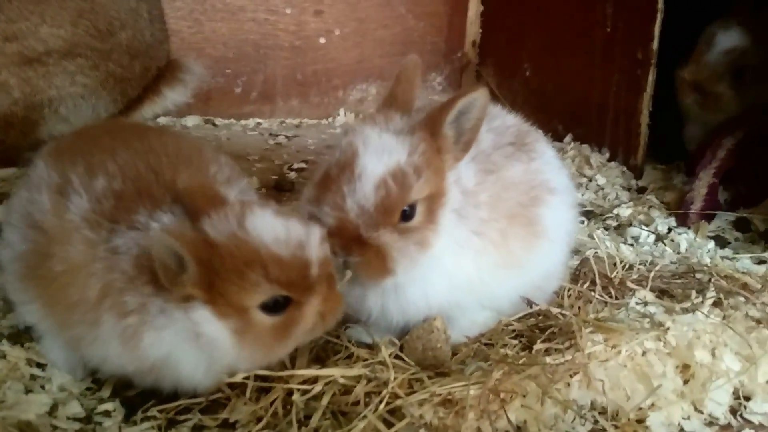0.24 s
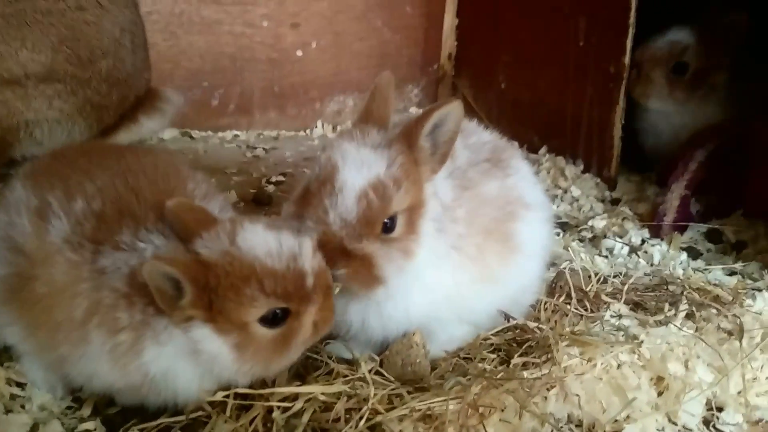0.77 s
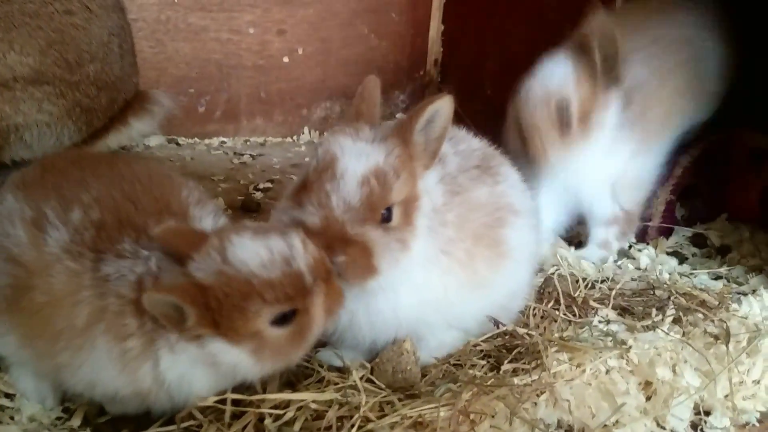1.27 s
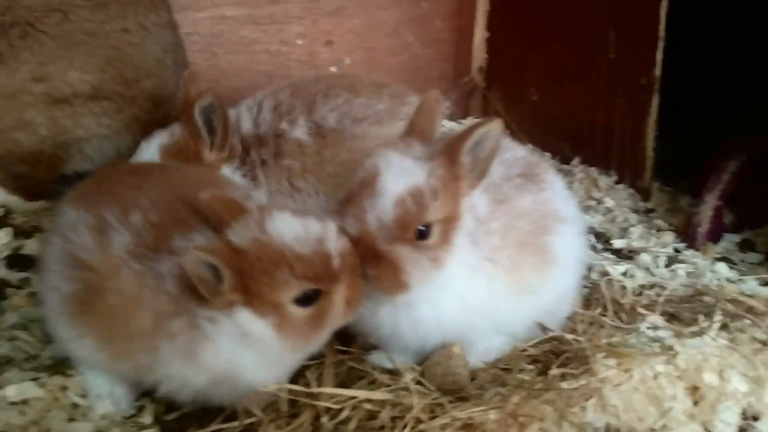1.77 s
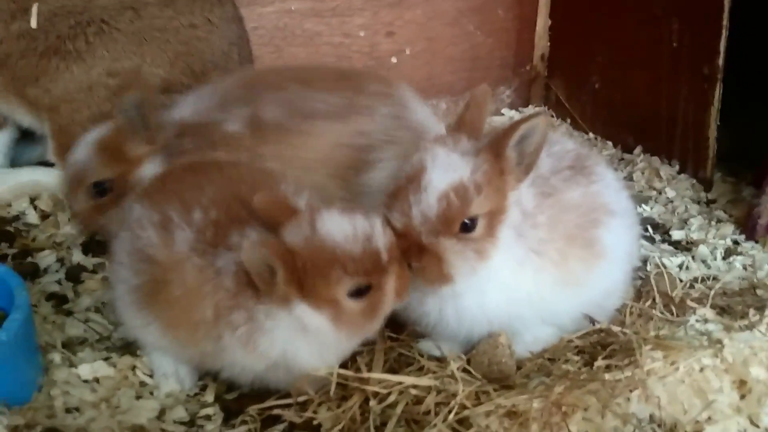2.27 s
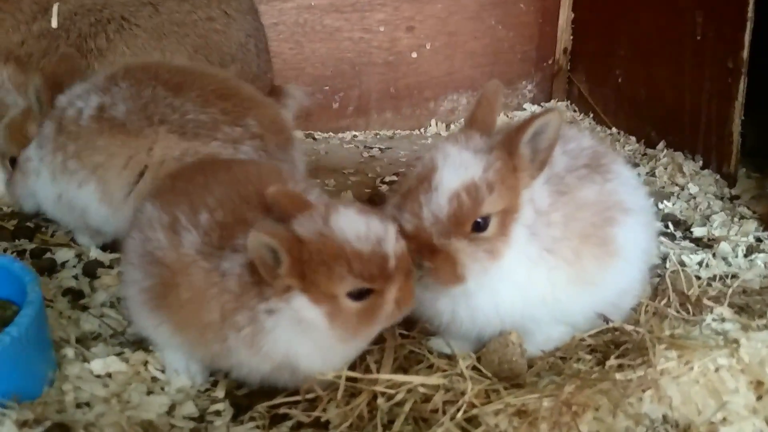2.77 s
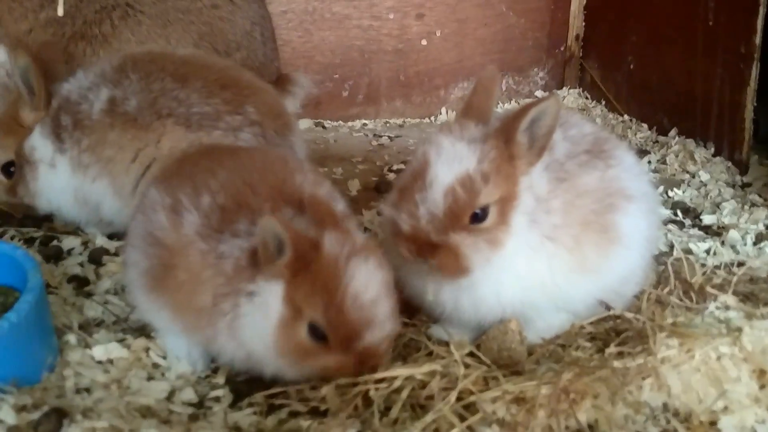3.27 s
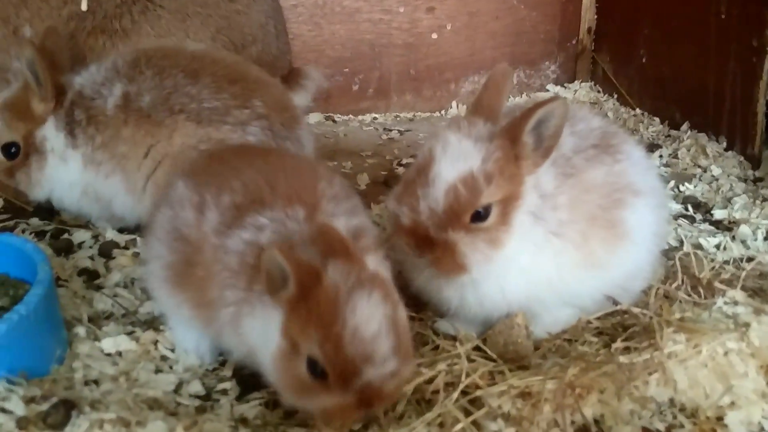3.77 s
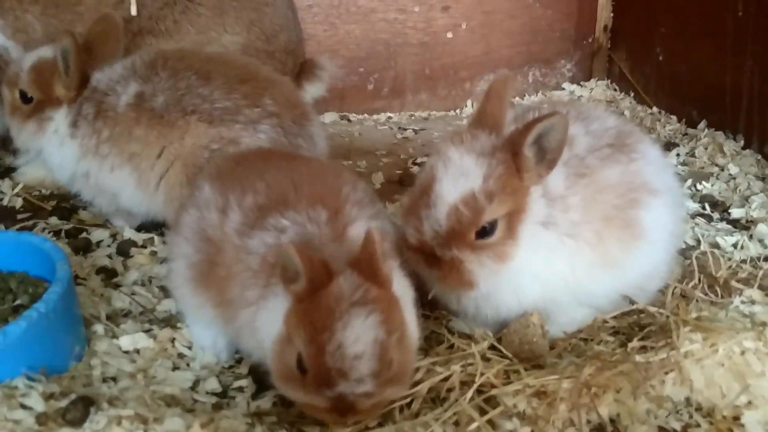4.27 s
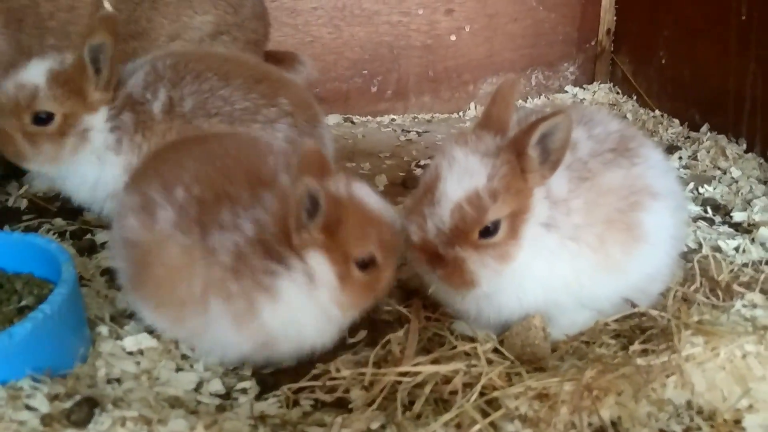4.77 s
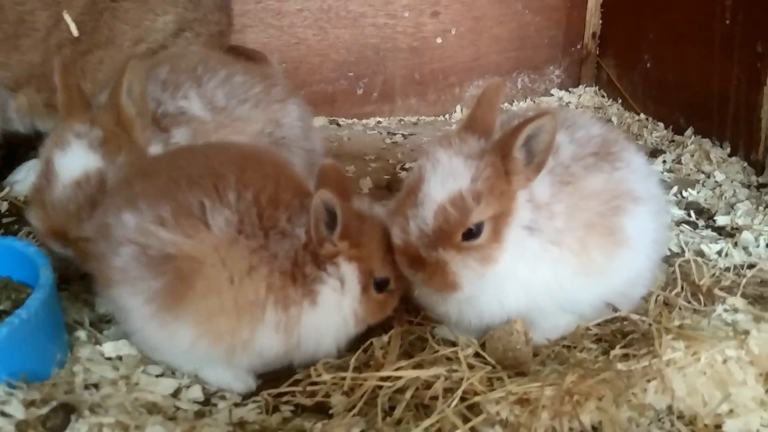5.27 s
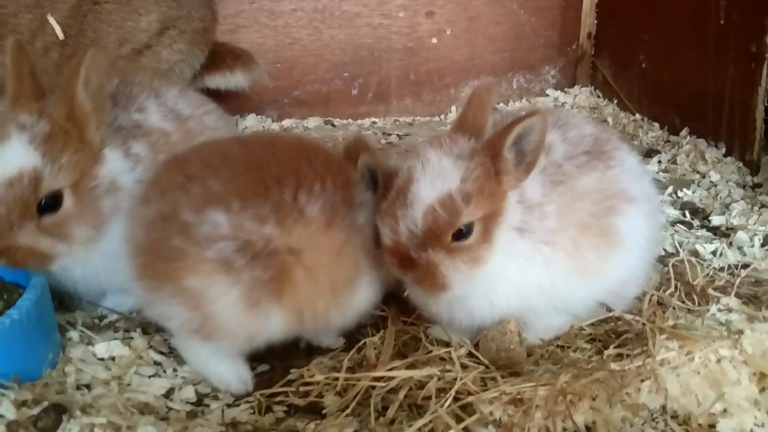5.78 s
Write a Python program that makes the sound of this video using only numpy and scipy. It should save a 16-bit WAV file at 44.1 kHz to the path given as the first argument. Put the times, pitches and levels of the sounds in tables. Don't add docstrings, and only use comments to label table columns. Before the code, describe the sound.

Dry wood shavings and hay rustle and crackle in irregular bursts as small rabbits shuffle through a wooden hutch, with faint knocks and thuds.

```python
import sys
import numpy as np
from scipy import signal
from scipy.fft import rfft, irfft
from scipy.io import wavfile
from scipy.ndimage import map_coordinates

SR = 44100
rng = np.random.default_rng(int(sys.argv[2]) if len(sys.argv) > 2 else 0)


def dump_mix(stems):
    frames = np.atleast_2d(stems).T
    limited = np.clip(frames, -1, 1)
    pcm = np.round(limited * 32767).astype(np.int16)
    wavfile.write(sys.argv[1], SR, pcm)


def elevation(decibels):
    levels = np.asarray(decibels, float)
    return 10 ** (levels / 20)


N = 266364

# start_s, held_s, level_db, coarse_flakes_above_it_db
MOVES = [(0.0, .12, -52, -9.5), (0.227, 0.027, -43.5, -8.5), (0.17, 0.032, -51, -5.5),
         (0.299, 0.14, -42.5, -10), (0.49, 0.19, -53.5, -17), (0.63, 0.3, -46, -12.5),
         (0.85, 0.18, -48.5, -14), (1.10, 0.15, -47, -13), (1.24, 0.23, -51.5, -14),
         (1.36, 0.17, -46, -7.5), (1.53, 0.13, -58.5, -5.5), (1.698, 0.099, -48.5, -13),
         (1.857, 0.17, -47, -17.5), (2.14, 0.22, -44.5, -14), (2.752, 0.14, -46.5, -11.5),
         (2.87, 0.32, -50.5, -8.5), (3.18, 0.041, -39.5, -19), (3.24, 0.047, -44, -9),
         (3.46, 0.094, -46.5, -9.5), (3.57, 0.073, -51.5, -7.5), (3.67, 0.31, -49, -12.5),
         (3.33, 0.063, -54.5, -10), (3.99, 0.044, -52.5, -12), (4.15, 0.15, -61, -20),
         (4.37, 0.038, -55, -7.5), (4.6, 0.146, -67, -17), (5.259, 0.24, -58, -6.5),
         (5.561, 0.046, -52.5, -4.5), (5.68, 0.263, -57, -8.5), (5.96, .1, -51, -11.5)]
# start_s, held_s, level_db
BRUSHES = [(0.0, 4.1, -53), (5.4, .64, -59), (0.30, 0.24, -63), (0.93, .04, -59), (1.38, .24, -46),
           (1.78, .22, -75), (2.24, 0.13, -46), (2.80, 0.22, -49), (3.038, 0.17, -48), (3.25, 0.039, -44),
           (3.46, .03, -59), (3.90, 0.093, -50), (5.56, 0.036, -59), (5.96, .08, -58)]
PRESS_S, SETTLE_DB_PER_S = 0.065, 315
REST_DB, REST_COARSE_DB, REST_FINE_DB = -86, -76.5, -80
MOVE_FINE_DB, MOVE_DUST_DB = -36, -24
BRUSH_FINE_DB, BRUSH_DUST_DB = -28, -11.5
COARSE_TOP_HZ, FINE_FROM_HZ, FINE_TOP_HZ, DUST_FROM_HZ = 3000, 7200, 12200, 13600
# start_s, peak_db, coarse_part_db, fine_part_db
SNAPS = [(0.22, -33, -12, -8), (1.122, -29, -12, -22), (0.3391, -37, -31, -11), (0.434, -24, -16, -9),
         (0.515, -39, -5.5, -19), (0.5518, -27.5, -16, -20), (0.911, -30, -17, -24),
         (0.933, -22, -10.5, -24), (1.0031, -27, -15, -27), (1.0919, -28, -39, -19),
         (1.0135, -23, -24, -25), (1.9017, -26, -22, -28), (2.351, -28, -26, -27),
         (1.2152, -16.5, -22, -40), (1.29, -30, -17, -23), (1.493, -29, -32, -42), (1.639, -35, -37, -33),
         (2.2854, -20, -12.5, -24), (2.7268, -36.5, -28, -34), (2.8916, -32, -33, -12),
         (2.9872, -33.5, -8, -38), (3.084, -34, -29, -27), (3.2105, -42, -20, -16), (3.911, -33, -11, -27),
         (5.7683, -32, -10, -7), (5.7625, -38, -7, -2), (5.80, -50, -15, 4), (2.177, -34, -20, -10)]
# start_s, peak_db, coarse_part_db, fine_part_db
CRUSHES = [(0.24, -43, -22, -8), (0.8732, -28.5, -29, -34), (0.9444, -29.5, -4.5, -29),
           (1.017, -29, -6, -26), (1.342, -28.5, -39, -24), (5.570, -35, -3, -22), (1, -32, -35, -20),
           (1.588, -33, -25, -31), (1.7537, -53, -31, -23), (1.7715, -42, -38, -29), (2.119, -33, -17, -22),
           (2.585, -35.5, -11.5, -29), (2.6748, -39.5, -8, -26), (2.3239, -24.5, -8.5, -30),
           (3.071, -27, -11, -13), (3.1892, -22, -23, -33), (4.157, -42, -16, -35), (4.3755, -39, -13, -30),
           (4.5594, -36, -14, -26), (4.575, -41, -10, -28), (4.7194, -45, -11, -35),
           (4.9112, -38, -10.5, -27), (5.1786, -47, -4, -31), (5.659, -41, -4, -32), (0.219, -36, -9, -16),
           (5.467, -42.5, -1, -20), (5.765, -32, -9, -10), (5.778, -37, -12, -20), (2.298, -32, -11, -17),
           (0.91, -35, -9, -30), (3.968, -41, -5, -30), (5.998, -36.5, -11, -11), (5.381, -43, -11, -18),
           (5.272, -42, -10, -20)]
# start_s, peak_db, coarse_part_db, fine_part_db
SLIDES = [(0.306, -25, -35, -21), (0.6404, -32, -12, -12), (0.7372, -38, -31, -17), (1.162, -25, -35, -21),
          (1.355, -35, -35, -26), (1.455, -19.5, -10, -49), (1.9464, -31, -38, -26),
          (2.158, -29.5, -28, -24), (2.2065, -23, -23, -22), (2.79, -36, -11, -16), (3.682, -29, -20, -36),
          (3.758, -26.5, -26, -32), (3.806, -28.5, -27, -26), (3.2582, -30.5, -6.5, -35),
          (3.4818, -37, -4, -14), (3.512, -23.5, -39, -24), (3.7266, -34, -30, -41),
          (4.2194, -51, -19, -33), (4.4608, -45, -9, -28), (5.4241, -42, -9, -23), (5.585, -54, 1, -28),
          (3.91, -35, -11, -28), (4.65, -51, -22, -30), (5.445, -46, -9, -13), (5.9708, -37, -12, -14)]
# shower_swells_s, shower_dies_s, first_crack_db
SNAP, CRUSH, SLIDE = (0.0023, 0.027, -1.7), (0.0033, 0.071, -27), (0.014, 0.1, -18)
BREAK_SIDE_DB = -3
# freq_hz, level_db_per_hz
BEDDING = [(410, -55.5), (700, -28), (1010, -20.5), (1120, -17.5), (1240, -14), (1650, -12.5), (2230, -5),
           (3130, -13), (4220, 1.5), (4740, 5), (5990, -4), (7580, -12.5), (11200, -8), (15700, -20)]
# time_s, left_lead_ms, left_right_db
LEFT_LEAD = [(0, 0.34, -6), (1, .32, -5.5), (2, 0.32, -3), (3, 0.33, -6.5), (3.9, 0.35, -4),
             (4.2, -0.17, -6), (5.4, 0.13, -9.5), (5.7, 0.12, -9)]
# start_s, peak_db, pitch_hz
FLICKS = [(0.1875, -36, 4380), (0.2204, -33, 4590), (0.3027, -29, 4880), (0.3802, -26, 2410),
          (0.435, -22, 5390), (0.4614, -42, 4860), (0.5404, -39, 4620), (0.5574, -36, 4800),
          (0.5774, -43, 4410), (0.5975, -28, 5460), (0.8719, -32, 5340), (0.9112, -27, 4170),
          (0.9318, -24, 4940), (0.945, -29, 4090), (0.9797, -24, 4170), (1.003, -27, 4070),
          (1.0131, -20, 4400), (1.0384, -34, 4330), (1.1583, -31, 4690), (1.1684, -29, 5060),
          (1.2146, -17, 4810), (1.29, -31, 4100), (1.4062, -33, 4720), (1.4461, -25.5, 2220),
          (1.4684, -27, 4560), (2.1754, -32, 5070), (2.2324, -31, 4820), (2.2684, -26, 4370),
          (2.2847, -19, 3870), (2.2984, -30, 5670), (2.3226, -28, 4390), (2.3304, -29, 4160),
          (3.6034, -38, 4460), (3.9214, -34, 4660), (4.0484, -44, 4650), (4.911, -43, 4860),
          (5.101, -46, 4300), (5.2724, -43, 4290), (5.3812, -41, 4480), (5.5644, -38, 2510),
          (5.576, -33, 2520), (5.6064, -39, 4450), (5.6977, -46, 2330), (5.7683, -19, 4540),
          (5.7784, -32, 4330), (5.9824, -36, 4400), (6.0064, -37, 4890)]
FLICK_CYCLES, FLICK_DB, FLICK_UPPER_DB = 22, -3.0, -13
# start_s, lasts_s, from_hz, to_hz, level_db
SQUEAKS = [(3.575, 0.038, 4400, 4460, -49.5), (3.622, 0.025, 4240, 4630, -49),
           (4.622, 0.02, 4480, 4420, -56), (4.638, 0.022, 4350, 4400, -54), (4.59, 0.03, 4800, 4700, -58),
           (4.643, 0.016, 4750, 4780, -55), (4.655, 0.025, 3500, 3650, -66), (4.69, 0.042, 4550, 4450, -62),
           (4.69, 0.038, 3700, 3310, -66), (1.14, 0.067, 2450, 2323, -52), (3.80, 0.081, 2750, 2590, -52),
           (3.86, 0.045, 2450, 2210, -51), (4.658, 0.032, 4400, 3900, -58), (4.72, 0.0079, 5900, 5900, -66),
           (4.742, 0.015, 4900, 4950, -61)]
# start_s, peak_db, pitch_hz, t60_s
KNOCKS = [(0.215, -50, 433, 0.14), (0.388, -41.5, 433, 0.12), (0.574, -58, 930, 0.053),
          (0.634, -56, 417, 0.19), (0.931, -69, 1270, 0.068), (1.003, -67, 1160, 0.044),
          (1.088, -59, 436, 0.79), (1.372, -60.5, 933, 0.43), (1.447, -45.5, 990, 0.086),
          (1.472, -48.5, 460, 0.18), (2.323, -57, 1100, 0.12), (2.76, -59, 835, 0.34),
          (3.069, -59.5, 500, 0.085), (3.25, -45, 910, 0.18), (3.482, -51, 886, 0.027),
          (3.636, -56.5, 630, 0.088), (3.931, -51.5, 396, 0.058), (4.375, -59, 520, 0.21),
          (5.269, -58, 860, 0.53), (5.565, -49.5, 1047, 0.14), (5.572, -50, 1500, 0.06),
          (5.766, -50.5, 410, 0.12)]
# start_s, peak_db, pitch_hz, t60_s
TICKS = [(1.4511, -27.5, 2185, 0.03), (3.9398, -32, 2120, 0.014), (3.9547, -21.5, 2200, 0.014),
         (3.9547, -22, 3900, 0.010), (3.9597, -31, 2500, 0.014), (4.3, -38, 4900, 0.025),
         (3.956, -39, 1330, 0.018)]
# time_s, level_db
SCUFF = [(0.0, -61.5), (0.2, -66), (0.23, -61), (0.36, -59), (0.4, -56), (0.47, -60), (0.69, -68),
         (2.59, -72.5), (3.2, -68), (3.3, -59), (3.62, -62.5), (4.1, -70.5), (4.93, -77), (5.54, -61),
         (6.04, -68.5)]
# freq_hz, level_db_per_hz
BOARDS = [(120, -65), (200, -19.5), (393, 0), (477, -5.5), (545, 1.5), (758, -3), (811, 3), (1190, -7),
          (1500, -11.5), (1950, 0.5), (3300, -120)]
# start_s, peak_db, pitch_hz, lasts_s
THUMPS = [(0.051, -56.5, 146, 0.033), (0.175, -67, 151, 0.035), (0.315, -54.5, 159, 0.023),
          (0.471, -51.5, 73, 0.02), (0.569, -51.5, 121, 0.025), (0.634, -64.5, 151, 0.045),
          (1.098, -72, 72.7, 0.028), (1.168, -51.5, 128, 0.022), (1.26, -66, 72.7, 0.028),
          (1.373, -52, 91, 0.016), (1.462, -50, 135, 0.036), (1.503, -54.5, 82, 0.061),
          (1.563, -55.5, 72.7, 0.039), (1.606, -50, 72.7, 0.015), (1.831, -63, 131, 0.027),
          (3.231, -59, 129, 0.033), (3.932, -51, 210, 0.019), (5.691, -61.5, 143, 0.037)]
# start_s, peak_db, pitch_hz, push_s, t60_s
BOOMS = [(4.955, -44, 66, 0.089, 0.063), (5.057, -53.5, 65.4, 0.04, 0.25),
         (5.166, -58.5, 67.5, 0.043, 0.19), (5.276, -50, 72, 0.053, 0.081), (5.361, -58.5, 57, 0.014, 0.39)]
BOOM_OVERTONE_DB, BOOM_WOBBLE, PANEL_DB = -16, 0.071, -11.5
HUTCH_T60_S, HUTCH_DB = 0.05, -6
# freq_hz, level_db_per_hz
AIR = [(21, -33), (35, 14.5), (68, 4), (189, -9.5), (348, -9), (659, -15.5), (1490, -9.5), (2300, -7.5),
       (3460, -8.5), (4470, -3), (5910, -10), (8030, -17.5), (12900, -19.5), (15600, -16)]
AIR_DB = -59
# freq_hz, left_right_likeness
AIR_LIKENESS = [(60, 0.45), (180, 0.78), (550, 0.28), (1650, -0.26), (4970, -0.04), (15000, 0.1)]
# freq_hz, left_right_db
PORT_BALANCE = [(60, -6), (130, -6.5), (290, -3.5), (640, -0.5), (1410, -7.5), (3100, -7.5), (6820, -4),
                (15000, 0.5)]
PORT_LOW_HZ, TOP_HZ = 49, 15830


def rms_one(x):
    return x / np.sqrt(np.mean(x ** 2) + 1e-20)


def in_time(rows):
    s, *columns = np.transpose(rows)
    return [np.interp(np.arange(N) / SR, s, c) for c in columns]


def at_hz(points, hz):
    table_hz, level = np.transpose(points)
    return np.interp(np.log(hz), np.log(table_hz), level)


def convolve(x, response):
    return signal.fftconvolve(x, response)[:N]


def causal(level_db):
    size = 8192
    hz = np.maximum(np.fft.rfftfreq(size, 1 / SR), 1)
    cepstrum = irfft(level_db(hz) * np.log(10) / 20)
    cepstrum[1:size // 2] *= 2
    response = irfft(np.exp(rfft(cepstrum[:size // 2 + 1], size)))[:size // 2]
    return response / np.sqrt(np.sum(response ** 2))


def drift(rate):
    r = np.exp(-2 * np.pi * rate / SR)
    noise = rng.standard_normal(N + SR)
    return rms_one(signal.lfilter([1], [1, -2 * r, r * r], noise)[SR:])


def grains(per_s, spread_db):
    sizes = elevation(spread_db * np.minimum(rng.exponential(1, N), 5)) * rng.choice([-1, 1], N)
    return rms_one(sizes * (rng.random(N) < per_s / SR))


def placed(table, shapes):
    out = np.zeros(N + SR)
    for row, shape in zip(table, shapes):
        out[round(row[0] * SR):][:len(shape)] += shape
    return out[:N]


def pair(x, pan_db, lead_s=0):
    n = np.arange(N)
    late = [map_coordinates(x, [n + side * lead_s * SR / 2], order=3, mode="nearest") for side in (1, -1)]
    return np.array(late) * elevation(np.outer([.5, -.5], pan_db * np.ones(N)))


def bouts(table, db, rest_db):
    start_s, held_s = np.transpose(table)[:2, :, None]
    t = np.arange(0, N, 32) / SR - start_s
    shape = np.clip(t / PRESS_S + .5, 0, 1) * elevation(-SETTLE_DB_PER_S * np.maximum(t - held_s, 0))
    power = elevation(2 * rest_db) + elevation(2 * db) @ shape ** 2
    return np.interp(np.arange(N) / 32, np.arange(len(power)), np.sqrt(power))


def band(low_hz, high_hz):
    def level_db(hz):
        edges = (1 + (low_hz / hz) ** 8) * (1 + (hz / high_hz) ** 8)
        return at_hz(BEDDING, hz) - 10 * np.log10(edges)
    return causal(level_db)


def bedding():
    move_db, move_coarse_db = np.transpose(MOVES)[2:]
    rustle = bouts(MOVES, move_db, REST_DB)
    coarse = bouts(MOVES, move_db + move_coarse_db, REST_COARSE_DB)
    brush = bouts(BRUSHES, np.transpose(BRUSHES)[2], REST_FINE_DB)
    fine = np.hypot(brush * elevation(BRUSH_FINE_DB), rustle * elevation(MOVE_FINE_DB))
    dust = np.hypot(brush * elevation(BRUSH_DUST_DB), rustle * elevation(MOVE_DUST_DB))

    lead_ms, pan_db = in_time(LEFT_LEAD)
    clumps_db = 1.2 * drift(rate=40) + 2.6 * drift(rate=150)
    rub = pair(grains(4000, spread_db=1.5) * elevation(clumps_db - 6.5), pan_db, lead_ms / 1000)
    apart = np.array([grains(6000, spread_db=3.0) for side in "LR"])
    rub += apart * elevation(clumps_db - 3.5 + np.outer([.5, -.5], pan_db))

    kinds = ((SNAPS, SNAP), (CRUSHES, CRUSH), (SLIDES, SLIDE))
    breaks = [row + kind for table, kind in kinds for row in table]
    s, peak_db, snap_coarse_db, snap_fine_db, swells_s, dies_s, crisp_db = np.transpose(breaks)
    t = np.arange(SR // 5) / SR
    after_s = np.maximum(t - swells_s[:, None], 0)
    swell = np.minimum(t / swells_s[:, None], 1) * elevation(-11.0 - 60 * after_s / dies_s[:, None])
    shower = pair(grains(5000, spread_db=2.0), 0, lead_ms / 1000)
    at = (s * SR).astype(int)
    lead_s, snap_pan_db = lead_ms[at] / 1000, pan_db[at] + BREAK_SIDE_DB

    # low_hz, high_hz, stirring gain, share of each break in dB, first crack in dB
    sizes = [(10, COARSE_TOP_HZ, coarse, snap_coarse_db + 1.5, 11),
             (COARSE_TOP_HZ, FINE_FROM_HZ, rustle, 0, 10),
             (FINE_FROM_HZ, FINE_TOP_HZ, fine, snap_fine_db + 0.5, 4),
             (DUST_FROM_HZ, SR, dust, snap_fine_db + 6, 1.5)]
    out = np.zeros((2, N))
    for low_hz, high_hz, stir, snap_db, crack_db in sizes:
        flakes = rub * stir * elevation(1.5 * drift(rate=12))
        response = band(low_hz, high_hz)
        for port, side in enumerate((.5, -.5)):
            gains = elevation(peak_db + snap_db + side * snap_pan_db)[:, None]
            arrivals = (s - side * lead_s)[:, None]
            cracks = placed(arrivals, gains * elevation(crisp_db + crack_db)[:, None])
            showers = placed(arrivals - swells_s[:, None], gains * swell) * shower[port]
            out[port] += convolve(flakes[port] + cracks + showers, response)
    return out


def flicks():
    t = np.arange(SR // 30) / SR
    shapes = []
    for s, db, hz in FLICKS:
        ratio = rng.uniform(1.06, 1.58)
        dying = elevation(db + FLICK_DB - 60 * t * hz / FLICK_CYCLES) * np.minimum(t / 0.00042, 1)
        upper = elevation(FLICK_UPPER_DB) * np.sin(2 * np.pi * hz * ratio * t)
        shapes.append(dying * (np.sin(2 * np.pi * hz * t) + upper))
    lead_ms, pan_db = in_time(LEFT_LEAD)
    return pair(placed(FLICKS, shapes), pan_db, lead_ms / 1000)


def stick_slip(table, rough_db, rate):
    shapes = []
    for s, lasts, from_hz, to_hz, db in table:
        hz = np.linspace(from_hz, to_hz, int(lasts * SR))
        tone = np.sin(2 * np.pi * np.cumsum(hz) / SR)
        shapes.append(elevation(db) * np.sqrt(np.hanning(len(hz))) * tone)
    return placed(table, shapes) * elevation(rough_db * drift(rate))


def knocks():
    t = np.arange(SR // 3) / SR
    dying = [elevation(db - 60 * t / t60) * np.minimum(t / 0.0023, 1) for s, db, hz, t60 in KNOCKS]
    tones = [elevation(-6.5) * shape * np.sin(2 * np.pi * row[2] * t) for row, shape in zip(KNOCKS, dying)]
    rattle = elevation(-4.5) * placed(KNOCKS, dying) * grains(3000, spread_db=-7.5)
    return placed(KNOCKS, tones) + convolve(rattle, causal(lambda hz: at_hz(BOARDS, hz)))


def ticks():
    t = np.arange(SR // 10) / SR
    shapes = []
    for s, db, hz, t60 in TICKS:
        dying = elevation(db - 1.0 - 60 * t / t60) * np.minimum(t / 0.00068, 1)
        shapes.append(dying * np.sin(2 * np.pi * hz * t))
    return placed(TICKS, shapes)


def scuff():
    body = convolve(grains(1500, spread_db=1.5), causal(lambda hz: at_hz(BOARDS, hz)))
    return body * elevation(in_time(SCUFF)[0] - 4.5 + 2.0 * drift(rate=25))


def thumps():
    shapes = []
    for s, db, hz, lasts in THUMPS:
        u = np.linspace(0, 1, int(lasts * SR))
        cycles = hz * lasts * (1.52 * u - 0.56 * u ** 2)
        shapes.append(elevation(db) * np.sin(np.pi * u) ** 2 * np.sin(2 * np.pi * cycles))
    return placed(THUMPS, shapes)


def booms():
    t = np.arange(SR // 2) / SR
    floor, panel = [], []
    for s, db, hz, push, t60 in BOOMS:
        swell = np.sin(np.pi / 2 * np.minimum(t / push, 1)) * elevation(-60 * np.maximum(t - push, 0) / t60)
        turn = 2 * np.pi * hz / SR * np.cumsum(1 + BOOM_WOBBLE * drift(rate=8)[:len(t)])
        floor.append(elevation(db) * swell * (np.sin(turn) + elevation(BOOM_OVERTONE_DB) * np.cos(2 * turn)))
        buzz = np.sin(2 * np.pi * (225 * t + 260 * t ** 2))
        panel.append(elevation(db + PANEL_DB) * np.sqrt(swell) * buzz)
    return placed(BOOMS, floor) + placed(BOOMS, panel) * (0.68 + 0.42 * drift(rate=48))


def hutch(pair_in, count=40):
    t = np.arange(SR // 6) / SR
    hop = N // count + 1
    out = np.zeros((2, N + SR))
    padded = np.pad(pair_in, ((0, 0), (hop, 2 * hop)))
    for k in range(count + 1):
        cloud = rng.standard_normal((2, len(t))) * elevation(-60 * t / HUTCH_T60_S) * (t > .0012)
        cloud *= elevation(HUTCH_DB) / np.sqrt(np.sum(cloud ** 2, axis=1, keepdims=True))
        piece = padded[:, k * hop:(k + 2) * hop] * np.sqrt(np.hanning(2 * hop))
        echo = signal.fftconvolve(piece, cloud, axes=1)
        out[:, k * hop:k * hop + echo.shape[1]] += echo
    return pair_in + out[:, hop:hop + N]


def air():
    hz = np.maximum(np.fft.rfftfreq(N, 1 / SR), 1)
    alike = np.clip(at_hz(AIR_LIKENESS, hz), -1, 1)
    mid, side = rfft(rng.standard_normal((2, N))) * elevation(at_hz(AIR, hz))
    both = irfft(np.sqrt(1 + alike) * mid + np.sqrt(1 - alike) * side * [[1], [-1]], N)
    return elevation(AIR_DB + 0.24 * drift(rate=1.7)) * rms_one(both)


def scene():
    boards = pair(knocks() + scuff() + ticks(), -7.0, 0.00016)
    squeaks = pair(stick_slip(SQUEAKS, 6.0, 180), -10.5, 0.00017)
    inside = hutch(bedding() + boards + squeaks + flicks())
    floor = pair(thumps() + booms(), -6.5)
    return inside + floor + elevation([[-2], [2]]) * air()


def low_pass(x):
    return signal.sosfilt(signal.butter(12, 15830, fs=SR, output="sos"), x)


def record(dry):
    hz = np.maximum(np.fft.rfftfreq(N, 1 / SR), 1)
    tilt_db = at_hz(PORT_BALANCE, hz) + 5
    edges = (hz < TOP_HZ) / np.sqrt(1 + (PORT_LOW_HZ / hz) ** 8)
    ports = irfft(rfft(dry) * edges * elevation(np.outer([.5, -.5], tilt_db)), N)
    return low_pass(ports)


dry = scene()
out = record(dry)
dump_mix(out)
```